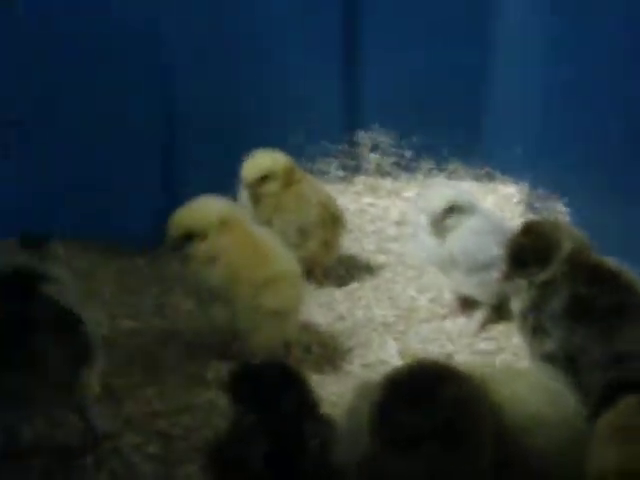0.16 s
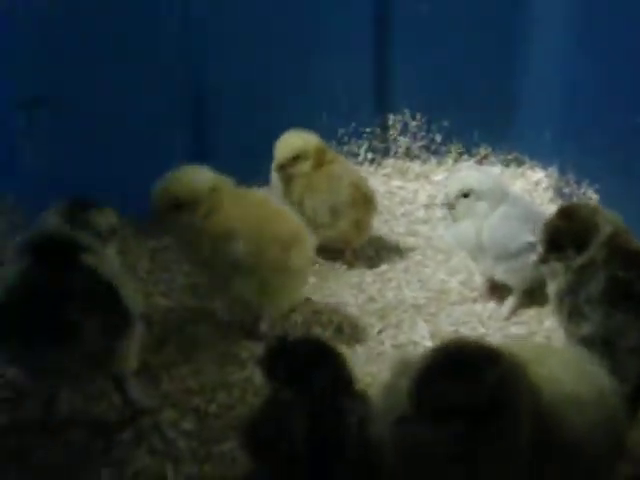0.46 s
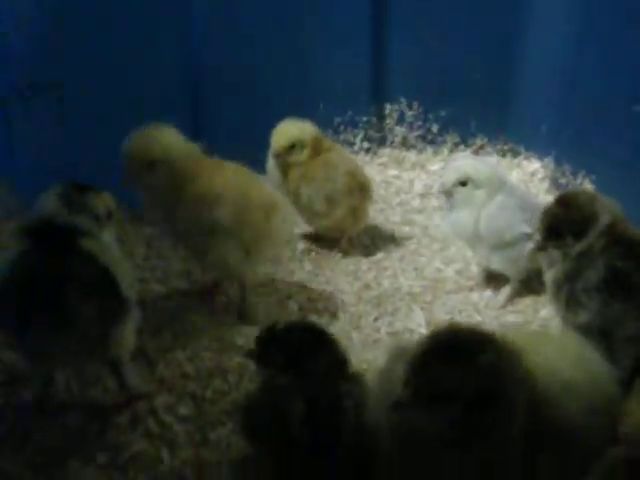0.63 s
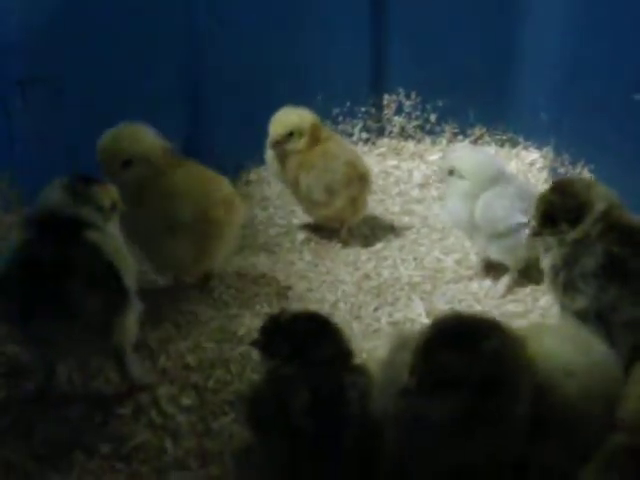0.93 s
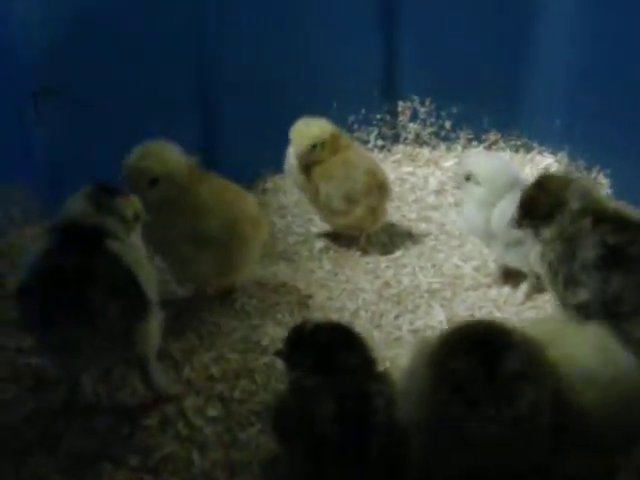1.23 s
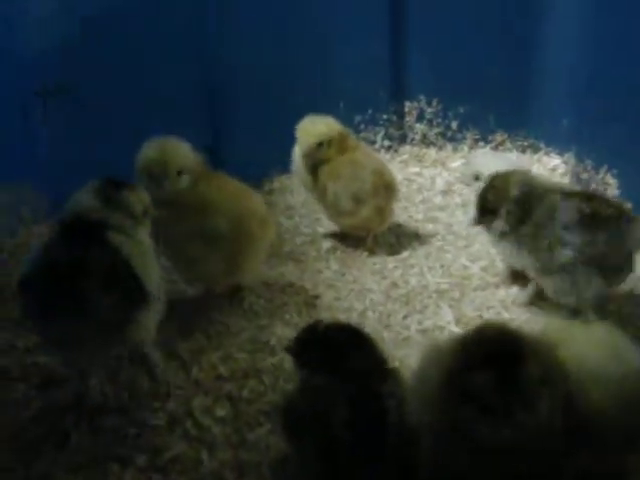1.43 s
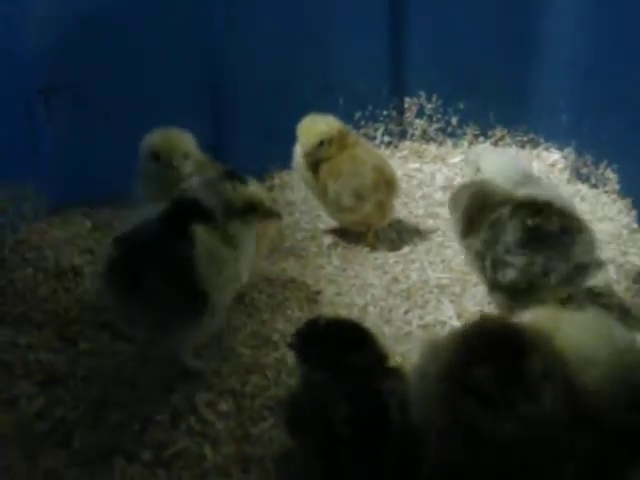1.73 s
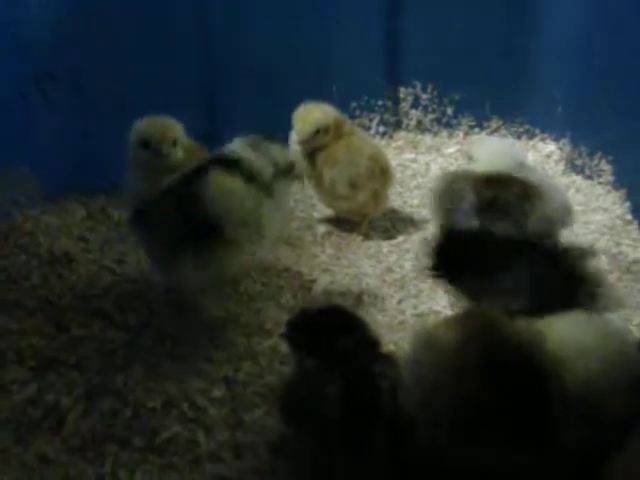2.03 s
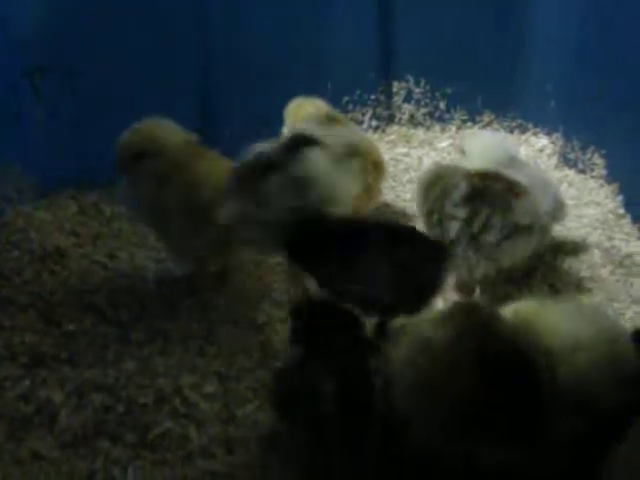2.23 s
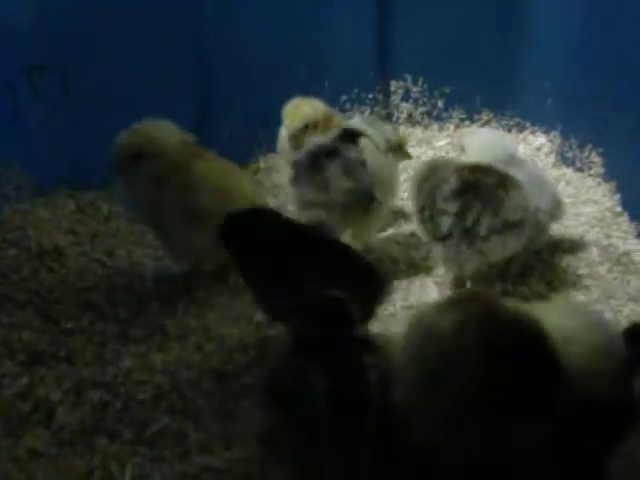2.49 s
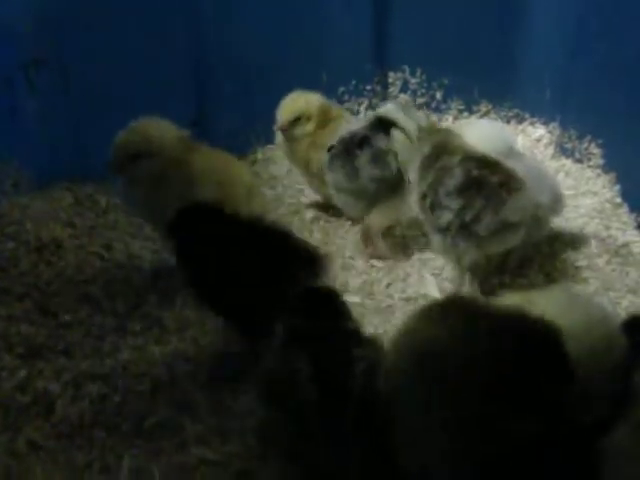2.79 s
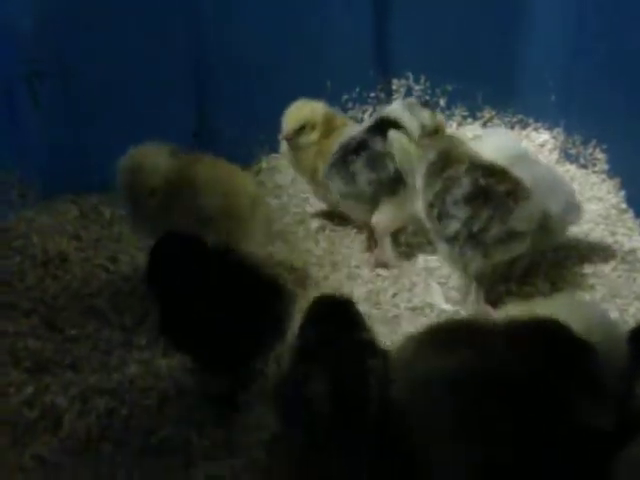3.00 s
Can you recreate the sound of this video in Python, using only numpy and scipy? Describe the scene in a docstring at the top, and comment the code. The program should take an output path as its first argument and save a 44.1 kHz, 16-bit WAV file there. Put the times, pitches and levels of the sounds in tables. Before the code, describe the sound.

A crowd of baby chicks peeping close by, over a faint low hum.

```python
"""Chicks in a brooder box

A crowd of newly hatched chicks, close to the microphone of a small camera, in mono. Each peep is a
near-pure whistle that is held, then mostly swoops down; the walls echo it briefly. Room air and a faint
hum lie underneath. The camera rumbles as it is moved, and the recorder adds a hiss that follows the level."""
import sys
import numpy as np
from scipy import signal
from scipy.fft import rfft, irfft
from scipy.io import wavfile

SR = 44100
rng = np.random.default_rng(int(sys.argv[2]) if len(sys.argv) > 2 else 0)


def generate_wav(sig):
    """Save sig (samples, or channels by samples) to the path in sys.argv[1] as 16-bit PCM at SR."""
    pcm = np.round(np.clip(np.atleast_2d(sig).T, -1, 1) * 32767).astype(np.int16)
    wavfile.write(sys.argv[1], SR, pcm)


N = 138915

# One row a peep; the knee is where the hold turns into the fall, and levels precede the harmonic gains:
# (start [s], hold [s], fall [s], first pitch [Hz], mid-hold pitch [Hz], knee pitch [Hz], last pitch [Hz],
#  bend of the fall [exponent], first level [dB], knee level [dB], last level [dB])
PEEP_CALLS = [(0.0, 0.023, 0.037, 4610, 4260, 4083, 2574, 2, -26, -25, -16.5),
              (0.0, 0.011, 0.085, 4040, 4080, 3870, 2340, 0.96, -10.5, -28, -37),
              (0.022, 0.049, 0.1, 5600, 6310, 6370, 3000, 1.28, -26, -27, -21),
              (0.073, 0.2, 0.086, 4524, 4056, 3786, 2770, 1.36, -33.5, -17, -33.5),
              (0.079, 0.02, 0.11, 6300, 5670, 5390, 2865, 1.05, -13, -15.5, -30.5),
              (0.222, 0.125, 0.047, 5160, 5050, 4976, 3295, 1.75, -31, -15.5, -29.5),
              (0.282, 0.037, 0.033, 3405, 3270, 3160, 2500, 1.4, -23, -31, -27.5),
              (0.381, 0.036, 0.036, 3810, 3672, 3516, 2540, 1.44, -27, -22, -40),
              (0.462, 0.05, 0.095, 5330, 6290, 6490, 3754, 0.92, -28.5, -20.5, -10),
              (0.467, 0.076, 0.053, 4700, 4700, 4562, 2404, 1.4, -28.5, -13.5, -28.5),
              (0.601, 0.05, 0.029, 3477, 3417, 3416, 2470, 1.14, -18.5, -17.5, -49),
              (0.616, 0.05, 0.054, 4520, 5100, 5110, 3243, 1.26, -24, -27.5, -11.5),
              (0.617, 0.12, 0.077, 5290, 5246, 4900, 3096, 1.0, -31, -19.5, -45),
              (0.637, 0.074, 0.047, 4140, 4050, 3820, 2650, 1.25, -27, -20, -33.5),
              (0.678, 0.057, 0.039, 5770, 5870, 5730, 3080, 1.92, -25, -24, -16.5),
              (0.887, 0.051, 0.0093, 4130, 4366, 4500, 3540, 0.31, -31.5, -18, -29),
              (0.908, 0.045, 0.1, 5625, 6370, 6526, 3071, 1.14, -26.5, -16.5, -23),
              (0.926, 0.063, 0.057, 3706, 3673, 3570, 2550, 1.8, -35.5, -17, -44),
              (0.973, 0.11, 0.098, 4106, 3987, 3919, 2457, 1.49, -22.5, -16, -30),
              (0.981, 0.034, 0.022, 5460, 5010, 4700, 3465, 0.49, -16, -14.5, -19),
              (1.024, 0.15, 0.053, 4790, 5140, 4730, 2300, 1.3, -32.5, -18.5, -32.5),
              (1.068, 0.066, 0.014, 4480, 4240, 3930, 4200, 0.71, -27, -20.5, -26),
              (1.099, 0.076, 0.021, 4820, 4560, 4500, 2470, 1.2, -30, -16, -39),
              (1.12, 0.048, 0.065, 5740, 6010, 5750, 4470, 0.89, -24, -24.5, -15.5),
              (1.14, 0.0094, 0.018, 4010, 4310, 4370, 3270, 1.25, -27, -15.5, -22),
              (1.182, 0.042, 0.025, 4590, 4270, 3975, 3080, 1.33, -19, -21, -11),
              (1.219, 0.037, 0.022, 3660, 2957, 2820, 2150, 2.4, -25.5, -18, -23.5),
              (1.24, 0.042, 0.02, 3495, 3193, 3030, 2260, 1.2, -26, -13, -36),
              (1.242, 0.043, 0.025, 3604, 3459, 3300, 2213, 1.1, -23.5, -17.5, -36),
              (1.354, 0.055, 0.081, 5690, 6340, 6595, 3737, 0.6, -29, -11, -23.5),
              (1.44, 0.025, 0.041, 4990, 5215, 5090, 2930, 0.48, -20.5, -13, -39),
              (1.475, 0.082, 0.025, 4620, 4100, 3944, 2300, 1.45, -22.5, -18, -37),
              (1.538, 0.092, 0.013, 4960, 5485, 5610, 5430, 1, -34, -18, -22),
              (1.583, 0.15, 0.063, 4106, 4006, 3947, 2403, 1.4, -22.5, -15, -27.5),
              (1.603, 0.098, 0.044, 4200, 4700, 4840, 3980, 2.8, -20, -25.5, -9),
              (1.638, 0.026, 0.055, 5615, 5295, 5130, 3250, 1.01, -16, -13, -22),
              (1.79, 0.034, 0.025, 4440, 5110, 5330, 3900, 2.5, -30.5, -15.5, -30),
              (1.85, 0.096, 0.07, 4790, 4710, 4585, 2337, 0.77, -38, -27, -25.5),
              (1.851, 0.08, 0.027, 4350, 3995, 3880, 2370, 1.33, -24.5, -17, -35),
              (1.858, 0.049, 0.082, 5650, 6220, 6380, 3600, 0.75, -25, -17.5, -12),
              (1.974, 0.1015, 0.055, 4990, 5440, 5400, 2960, 1.18, -42.5, -16.5, -30.5),
              (2.13, 0.11, 0.066, 4375, 4716, 4904, 3420, 1.56, -36, -20, -21.5),
              (2.131, 0.13, 0.075, 4032, 4061, 4017, 2385, 1.08, -21.5, -13, -43.5),
              (2.223, 0.048, 0.093, 4470, 5010, 5070, 3550, 0.64, -45, -20.5, -19.5),
              (2.29, 0.042, 0.047, 5000, 4770, 4466, 2870, 1.22, -37, -17.5, -26),
              (2.415, 0.099, 0.064, 4905, 5428, 5466, 3124, 1.05, -32.5, -20.5, -27.5),
              (2.425, 0.051, 0.048, 3555, 3690, 3720, 2530, 1.26, -35.5, -30, -35),
              (2.524, 0.053, 0.06, 4600, 5070, 4710, 3060, 0.49, -18.5, -25.5, -25.5),
              (2.569, 0.088, 0.048, 4330, 4430, 4390, 3250, 1.4, -27.5, -21.5, -40),
              (2.585, 0.027, 0.03, 3960, 3260, 2830, 2290, 2.46, -29, -21.5, -24),
              (2.66, 0.052, 0.056, 4334, 5160, 4870, 2680, 2.7, -25.5, -18.5, -21),
              (2.693, 0.13, 0.077, 3974, 4205, 4184, 2590, 1.3, -21.5, -11.5, -35.5),
              (2.717, 0.04, 0.036, 4600, 4960, 5020, 3730, 1.17, -22.5, -16.5, -18),
              (2.782, 0.035, 0.036, 3760, 3577, 3230, 2400, 1.07, -19, -18.5, -44),
              (2.832, 0.061, 0.032, 3720, 3503, 3410, 2250, 4.4, -18.5, -31.5, -27),
              (2.86, 0.054, 0.029, 4530, 5070, 4986, 3910, 1.33, -36, -24, -32),
              (2.938, 0.023, 0.038, 3780, 3783, 3700, 2540, 1.25, -21.5, -30, -21),
              (2.992, 0.1, 0.046, 4700, 4460, 4360, 3190, 1.24, -31.5, -24.5, -36),
              (3.002, 0.023, 0.017, 4350, 4130, 3810, 2740, 1.76, -36, -30, -19.5),
              (3.036, 0.02, 0.024, 2950, 2967, 2953, 2290, 2.57, -22.5, -27, -18),
              (3.087, 0.085, 0.0094, 4350, 4902, 4870, 5040, 0.99, -29, -15.5, -32)]
# Strength of a peep's first three harmonics, each by the pitch of the whistle: (pitch [Hz], gain [dB])
FIRST_HARMONIC = [(2200, 1.5), (3000, -3.5), (3650, 1.5), (4080, 2), (4550, -1), (5150, 2), (5800, -8),
                  (6600, -9)]
SECOND_HARMONIC = [(2200, 6.5), (2800, -4), (3400, -9), (3750, -20), (3980, -30), (4600, -29.5)]
THIRD_HARMONIC = [(3200, -32.5), (3750, -27), (4050, -31), (4400, -34.5), (5300, -49)]
# Spectrum of the room's air: (frequency [Hz], relative level [dB])
AIR_SPECTRUM = [(20, 3), (60, -3.5), (200, -4), (600, -12), (1900, -14.5), (5000, -1), (8000, -25.5),
                (16000, -38)]
# Rumbles of the camera body: (start [s], length [s], centre [Hz], level at the crest [dB])
CAMERA_BUMPS = [(0.058, 0.076, 204, -48), (0.12, 0.33, 143, -48.5), (0.396, 0.11, 160, -44.5),
                (0.33, 0.09, 260, -53)]

ATTACK_S, RELEASE_SHARE, FADE_BEND = 0.0071, 0.19, 1.44  # the last share of the fall tapers away
SCOOP_SHARE = 0.0304  # each peep starts this far flat and slides up
JITTER_SHARE, JITTER_HZ = 0.00475, 248  # unsteady pitch in the hold; it triples through the fall
HOLD_WOBBLE_DB, FALL_EXTRA_WOBBLE_DB, WOBBLE_HZ = 1.1, 3.2, 200
FLUTTER_AT_HZ, FLUTTER_REACH_HZ, FLUTTER_RATE_HZ, FLUTTER_DEPTH = 5560, 224, 495, 0.8
BRIGHT_DB_PER_S, PLAIN_HOLD_S, FOURTH_VS_THIRD_DB = 78.5, 0.032, -9.5
WALL_DB, WALL_MAX_DELAY_S = -6.5, 0.0076
TAIL_DB, TAIL_T60_S, TAIL_LOW_CUT_HZ = -19, 0.3, 3370


def amp(db):
    """Decibels to gain."""
    return 10 ** (np.asarray(db) / 20)


def unit(x):
    """Scales to rms 1."""
    return x / np.sqrt(np.mean(x ** 2) + 1e-20)


def gain_at(points, hz):
    """Reads a table of (frequency [Hz], level [dB]) as a gain."""
    f, db = np.transpose(points)
    return amp(np.interp(hz, f, db))


def add(mix, start_s, sound):
    """Mixes a sound in at its start time."""
    part = mix[max(round(start_s * SR), 0):][:len(sound)]
    part += sound[:len(part)]


def noise(shape):
    """Noise of rms 1 whose spectrum is shape(Hz)."""
    return unit(irfft(rfft(rng.standard_normal(N)) * shape(np.fft.rfftfreq(N, 1 / SR)), N))


def waver(t, rate_hz):
    """Smooth random wobble over the times t."""
    knots = rng.standard_normal(256)
    return np.interp(t * rate_hz, np.arange(len(knots)), knots)


def peep(hold_s, fall_s, first_hz, mid_hz, knee_hz, last_hz, bend, first_db, knee_db, last_db):
    """One chick, close up: a whistle arches, then swoops and turns rough, gaining overtones as it drops."""
    t = np.arange(0, hold_s + fall_s, 1 / SR)
    held, fallen = np.clip(t / hold_s, 0, 1), np.clip((t - hold_s) / fall_s, 0, 1)
    roughness = np.sqrt(fallen)
    arch = 1 - (2 * held - 1) ** 2
    hz = first_hz + (knee_hz - first_hz) * held + (mid_hz - (first_hz + knee_hz) / 2) * arch
    hz += (last_hz - knee_hz) * fallen ** bend
    hz *= 1 - SCOOP_SHARE * np.exp(-t / ATTACK_S)
    jitter = JITTER_SHARE * (1 + 2 * roughness) * waver(t, JITTER_HZ)
    phase = 2 * np.pi * np.cumsum(hz * (1 + jitter)) / SR
    contour_db = first_db + (knee_db - first_db) * held + (last_db - knee_db) * fallen ** FADE_BEND
    wobble_db = (HOLD_WOBBLE_DB + FALL_EXTRA_WOBBLE_DB * roughness) * waver(t, WOBBLE_HZ)
    taper = np.minimum(t / ATTACK_S, 1) * np.minimum((1 - fallen) / RELEASE_SHARE, 1)
    level = amp(contour_db + wobble_db) * taper
    # peeps held near one pitch flutter in level and phase
    nearness = np.exp(-((mid_hz - FLUTTER_AT_HZ) / FLUTTER_REACH_HZ) ** 2)
    flutter = FLUTTER_DEPTH * nearness * np.sin(np.pi * held ** 2)
    beat = 2 * np.pi * FLUTTER_RATE_HZ * t
    level *= 1 + flutter * np.cos(beat)
    phase += .5 * flutter * np.sin(beat)
    # a peep grows more piercing the longer it is held
    bright = amp(BRIGHT_DB_PER_S * (np.minimum(t, hold_s) - PLAIN_HOLD_S))
    second = gain_at(SECOND_HARMONIC, hz) * np.sqrt(bright)
    third = gain_at(THIRD_HARMONIC, hz) * bright
    gains = [gain_at(FIRST_HARMONIC, hz), second, third, third * amp(FOURTH_VS_THIRD_DB)]
    return level * sum(gain * np.sin(k * phase) for k, gain in enumerate(gains, 1))


def walls(direct, count=6):
    """Quick echoes off the near walls, different wherever a chick stands; the peep keeps its energy."""
    delays_s = WALL_MAX_DELAY_S * rng.uniform(.1, 1, count)
    signs = rng.choice([-1, 1], count)
    out = np.pad(direct, (0, round(WALL_MAX_DELAY_S * SR) + 1))
    for delay_s, sign in zip(delays_s, signs):
        add(out, delay_s, sign * amp(WALL_DB) / np.sqrt(count) * direct)
    return out * np.linalg.norm(direct) / np.linalg.norm(out)


def chicks():
    """The whole brood at close range, with the short, thin reverberant tail of the box."""
    peeps = np.zeros(N)
    for start_s, *shape in PEEP_CALLS:
        add(peeps, start_s, walls(peep(*shape)))
    t = np.arange(SR // 2) / SR
    decay = np.exp(-np.log(1000) * t / TAIL_T60_S) * (t > WALL_MAX_DELAY_S)
    low_cut = signal.butter(2, TAIL_LOW_CUT_HZ, "high", fs=SR)
    tail = signal.lfilter(*low_cut, rng.standard_normal(len(t)) * decay)
    return peeps + amp(TAIL_DB) * signal.fftconvolve(peeps, tail / np.linalg.norm(tail))[:N]


def room_tone(air_db=-54.5, hum_hz=323, hum_db=-68):
    """Still air and a faint steady hum, behind the chicks throughout."""
    air = noise(lambda f: gain_at(AIR_SPECTRUM, f))
    hum = np.sqrt(2) * np.sin(2 * np.pi * hum_hz * np.arange(N) / SR)
    return amp(air_db) * air + amp(hum_db) * hum


def camera_handling(width_hz=108):
    """Handling noise right at the microphone: the camera body rumbles softly as it is swung round."""
    out = np.zeros(N)
    for start_s, length_s, centre_hz, db in CAMERA_BUMPS:
        band = noise(lambda f: 1 / (1 + (2 * (f - centre_hz) / width_hz) ** 2))
        rumble = unit(band[:round(length_s * SR)])
        add(out, start_s, amp(db) * rumble * np.sqrt(np.hanning(len(rumble))))
    return out


def scene():
    """Chicks, handling and room tone at one microphone, close to the brood."""
    return (chicks() + camera_handling() + room_tone())[None]


def record(dry):
    """The recorder adds white hiss that rises and falls with the sound, then cuts the highest treble."""
    hiss_db, follow_s, cutoff_hz = -24, 0.0022, 15850
    window = np.hanning(2 * round(follow_s * SR) + 1)
    running_rms = np.sqrt(abs(signal.fftconvolve(dry[0] ** 2, window / window.sum(), "same")))
    hiss = amp(hiss_db) * running_rms * rng.standard_normal(N)
    lowpass = signal.firwin(511, cutoff_hz, window=("kaiser", 9), fs=SR)
    return signal.oaconvolve(dry + hiss, lowpass[None], "same")


dry = scene()
out = record(dry)
generate_wav(out)
```